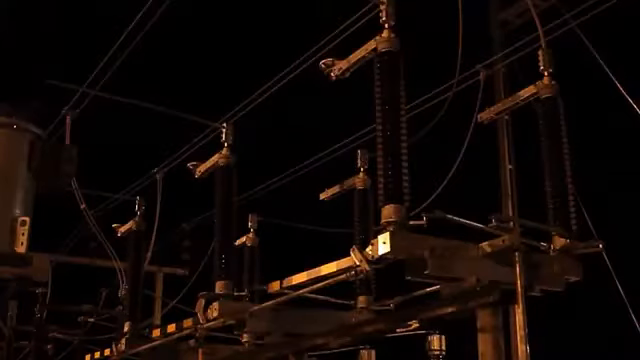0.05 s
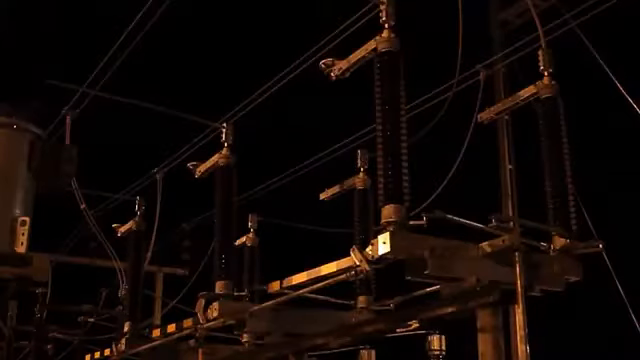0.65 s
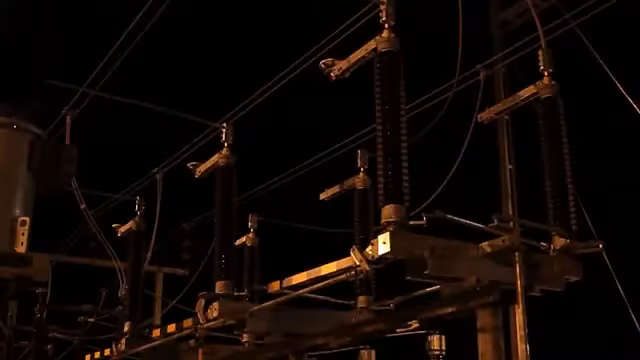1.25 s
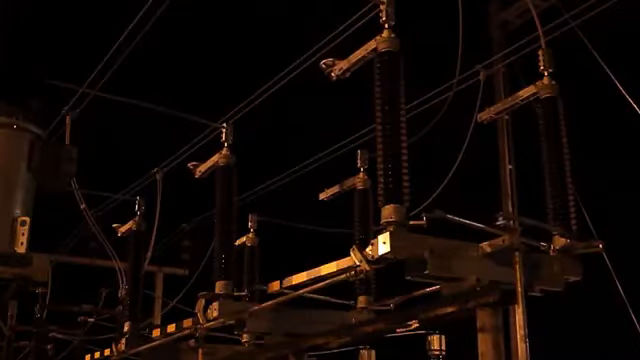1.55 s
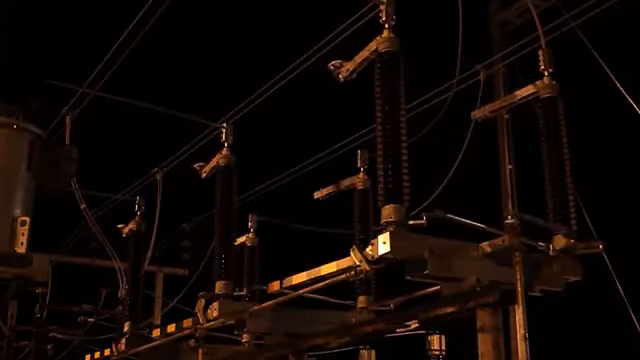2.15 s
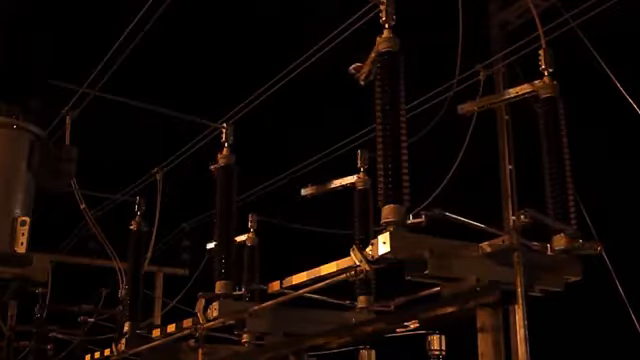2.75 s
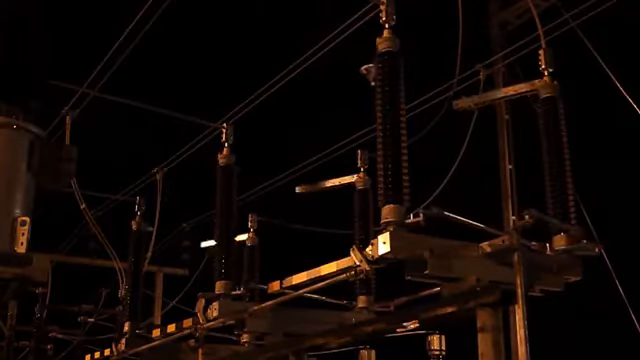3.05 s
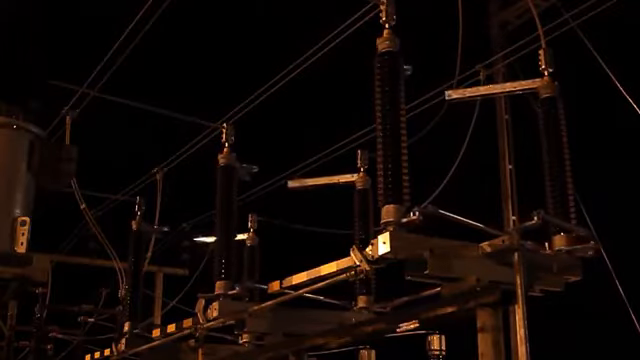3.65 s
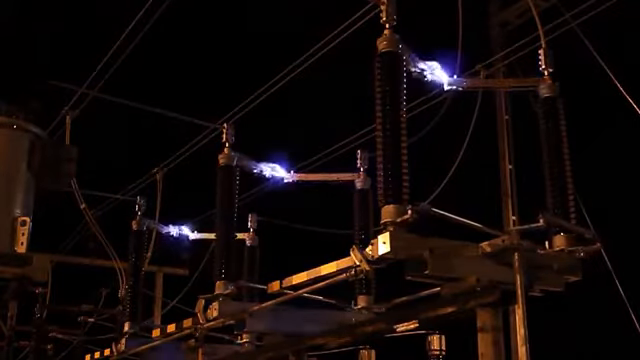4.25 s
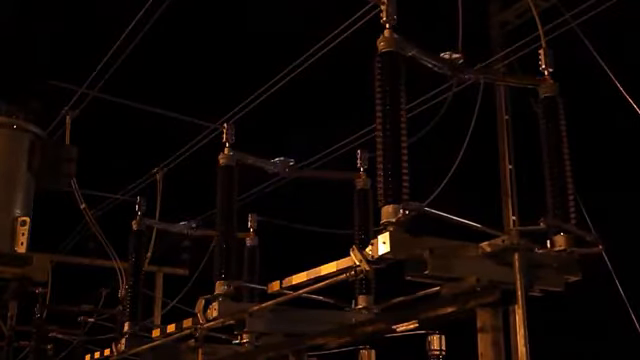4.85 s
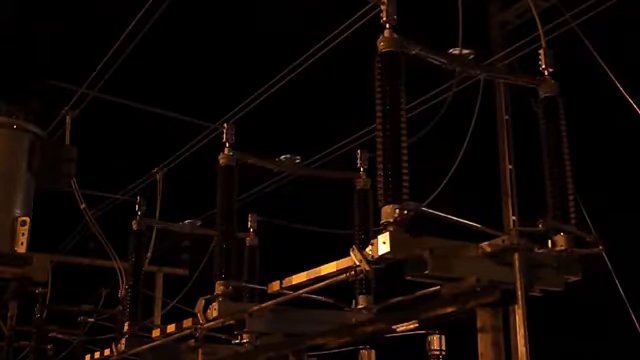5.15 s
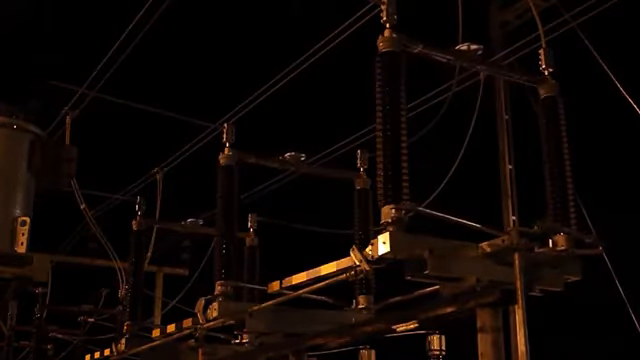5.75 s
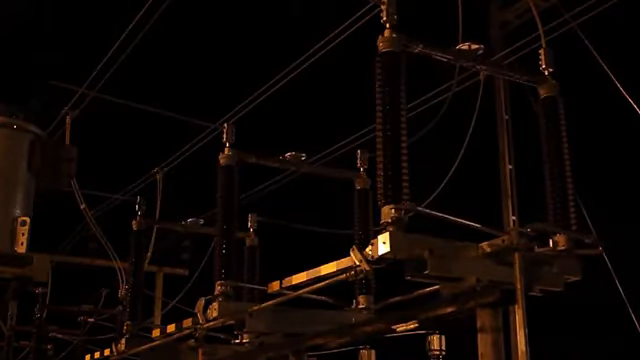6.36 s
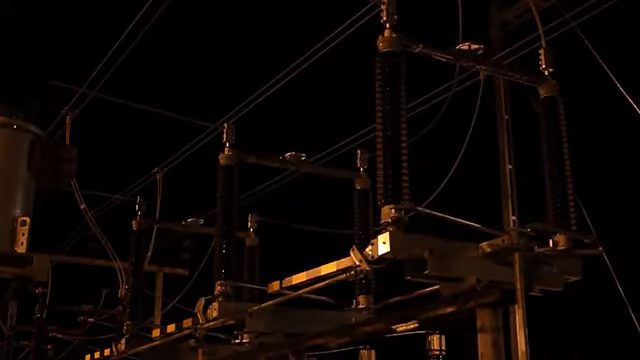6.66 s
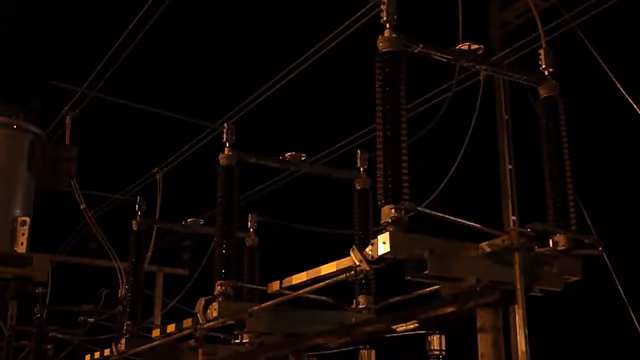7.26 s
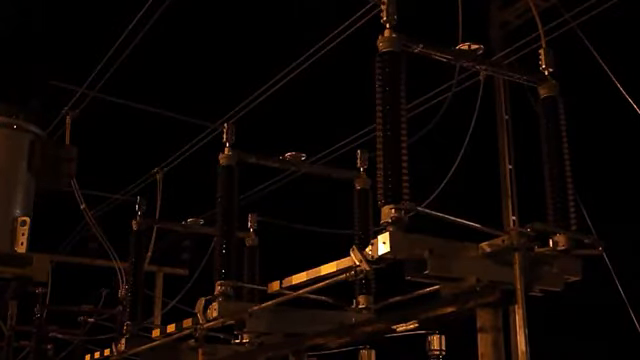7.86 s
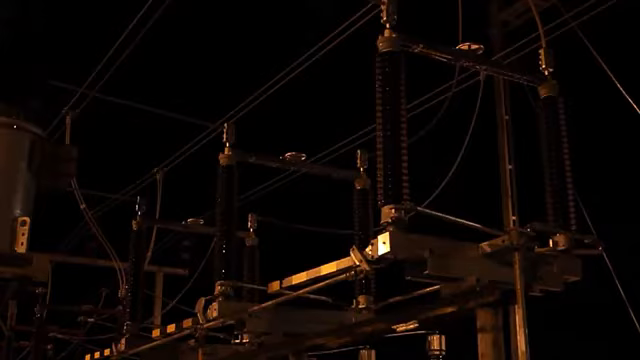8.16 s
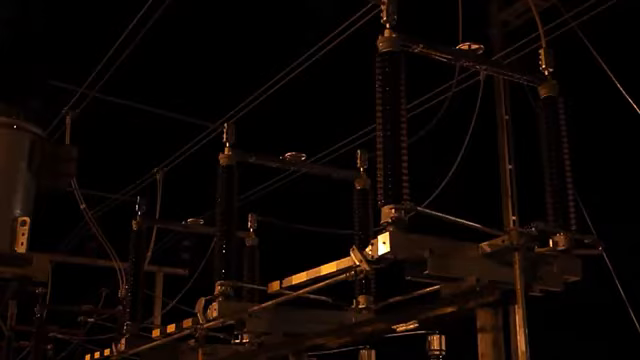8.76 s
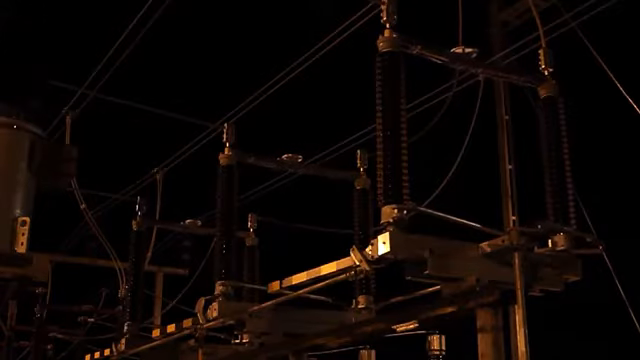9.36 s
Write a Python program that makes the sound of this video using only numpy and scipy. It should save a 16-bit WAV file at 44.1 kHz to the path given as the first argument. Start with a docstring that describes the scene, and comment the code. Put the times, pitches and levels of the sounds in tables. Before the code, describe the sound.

A faint transformer hum with a few tiny spark ticks and a soft thump opens the scene in an outdoor switchyard. At about 0.75 seconds a motor drive starts with a clack and jolt, then runs with a high, slightly wavering gear whine over metallic grinding. At 4.2 seconds a very loud electric crack with short thumps sets off a harsh, buzzing sizzle, which thins to a fizz and ends by 4.9 seconds. The arc pushes the motor down in level, and the whine swells back afterwards. Around 6.2 seconds the whine rises slightly, then winds down at 6.4 with a knock, a faint metal ring and a few faint scrapes. Only low hum and dull distant noise remain until 8.1 seconds, when the drive clacks into motion again and whines on to the end at about 9.5 seconds.

```python
"""A high-voltage switchyard at night. A motor drive swings a disconnector shut: its gears whine at the
tooth-mesh frequency, and tooth impacts excite the modes of housing and cabinet under changing load.
As the blades near their contacts the air breaks down; arcs crack and sizzle until metal meets metal,
and a gain control ducks the whole sound. The drive runs down, leaving transformer hum and distant
noise, and then starts up again."""
import sys
import numpy as np
from scipy import signal
from scipy.fft import rfft, irfft, next_fast_len
from scipy.io import wavfile
from scipy.ndimage import uniform_filter1d, map_coordinates

SR = 44100
rng = np.random.default_rng(int(sys.argv[2]) if len(sys.argv) > 2 else 0)


def put_to_file(sound):
    """Save the sound as 16-bit audio at rate SR, in the file named by the first command-line argument."""
    columns = np.atleast_2d(sound).T  # one column per channel
    safe = np.clip(columns, -1, 1)
    whole_steps = np.round(safe * 32767)
    wavfile.write(sys.argv[1], SR, whole_steps.astype(np.int16))


N = 419391
TIME = np.arange(N) / SR

# transformer hum, from twice the mains frequency upward: (frequency [Hz], level re background [dB])
HUM_PARTIALS = [(100, -13), (200, -7.5), (400, -14.5), (1000, -19.5)]


def motor_drive():
    """Gear noise follows speed and load: the motor runs, coasts to rest and starts again."""
    # each run at working speed: (time [s], mesh frequency [Hz], whine level [dB])
    first_run = [(0.82, 1091, -14.5), (0.87, 1091, -17), (0.9, 1144, -32.5), (0.99, 1152, -25.5),
                 (1.04, 1112, -14.5), (1.08, 1101, -19), (1.21, 1103, -22), (1.25, 1111, -19.5),
                 (1.35, 1116, -19.5), (1.39, 1138, -28.5), (1.46, 1151, -28), (1.49, 1135, -16.5),
                 (1.51, 1131, -25.5), (1.69, 1159, -26), (1.76, 1161, -21), (1.89, 1108, -18),
                 (2.05, 1124, -25), (2.14, 1113, -16), (2.18, 1100, -22.5), (2.35, 1113, -19),
                 (2.42, 1101, -23), (2.66, 1118, -18), (2.7, 1112, -21.5), (2.82, 1113, -18),
                 (3.0, 1114, -23), (3.1, 1128, -28), (3.18, 1120, -18), (3.26, 1126, -28),
                 (3.32, 1123, -18), (3.36, 1122, -20), (3.4, 1141, -27.5), (3.62, 1121, -18),
                 (3.66, 1121, -20), (3.71, 1130, -31), (3.84, 1114, -17), (4.0, 1112, -21.5),
                 (4.04, 1135, -27.5), (4.15, 1136, -25.5), (4.9, 1128, -25), (5.0, 1111, -17.5),
                 (5.1, 1147, -28.5), (5.19, 1146, -24), (5.26, 1104, -17.5), (5.33, 1123, -16.5),
                 (5.452, 1124, -25), (5.524, 1123, -21), (6.164, 1173, -24.5), (6.274, 1187, -36),
                 (6.33, 1177, -31), (6.36, 1180, -28), (6.385, 1180, -14.5), (6.415, 1177, -27)]
    second_run = [(8.18, 1105, -16), (8.238, 1103, -17.5), (8.278, 1159, -31.5), (8.338, 1162, -18),
                  (8.366, 1137, -22), (8.458, 1133, -20), (8.774, 1136, -25.5), (8.884, 1149, -20),
                  (9.024, 1149, -24), (9.084, 1135, -22), (9.44, 1106, -19), (9.5, 1107, -20)]
    # mesh harmonics, each near a resonance: (multiple, first-run level [dB], second-run level [dB],
    # resonance [Hz], bandwidth [Hz], lift [dB])
    harmonics = [(2, -34, -32.5, 2244, 60, 8), (3, -48, -38, 3412, 50, 9.5), (4, -46, -45, 4400, 40, 9),
                 (7, -50, -61, 8130, 200, 9.5)]
    # tones of the slower shaft: (multiple of its rate, first-run level [dB], second-run level [dB])
    shaft_tones = [(1, -0.5, 8), (1.5, -4.5, 2.5), (2, -2.5, -5), (2.75, -5.5, -25), (4.1, 0.5, -13),
                   (4.4, 0.5, -12), (5.4, 0.5, -9), (7.4, -9, -0.5), (8.4, -4.5, 1.5), (9.8, -15, -12),
                   (10.8, -7.5, -0.5), (11.8, -8, -18)]
    first = gear_train(first_run, on_s=0.745, off_s=6.34, free_hz=1192.5,
                       harmonics=[(k, db, *mode) for k, db, _, *mode in harmonics],
                       shaft_tones=[(k, db) for k, db, _ in shaft_tones], tones_db=-8.5,
                       grind_db=-25.3, ring_db=-29.5, body_db=-25.8, shudder_db=-12.5, jolt_db=-3)
    second = gear_train(second_run, on_s=8.112, off_s=np.inf, free_hz=1206,
                        harmonics=[(k, db, *mode) for k, _, db, *mode in harmonics],
                        shaft_tones=[(k, db) for k, _, db in shaft_tones], tones_db=-10.5,
                        grind_db=-25.0, ring_db=-30.0, body_db=-28, shudder_db=-16.5, jolt_db=-20.5)
    return first + second


def gear_train(run, on_s, off_s, free_hz, harmonics, shaft_tones, tones_db,
               grind_db, ring_db, body_db, shudder_db, jolt_db):
    """Forced vibration: teeth whine, their impacts shake housing and cabinet, a shaft adds tones."""
    # modes of the steel cabinet and gear housing: (frequency [Hz], bandwidth [Hz], relative level [dB])
    cabinet_modes = [(190.2, 22.3, -20), (278, 35, -24), (380.7, 19.3, -7), (411, 11, -11), (460, 20.6, -6),
                     (738, 11, -16.5), (791, 14, -14), (952, 26, -7.5), (1109, 21, -2.5), (1299, 62, -9),
                     (1358, 27, -4), (1498, 57, -6.5), (1575, 26, -4.5), (1686, 32, 3.5), (1738, 27, 3),
                     (1795, 25, 4.5), (1937, 37, -4.5), (2117, 35, 2)]
    housing_modes = [(2293, 57, 1), (2497, 50, 1), (2689, 47, 5.5), (2957, 17, 5), (3124, 29, 0),
                     (3412, 44, 1.5), (3720, 46, -3), (4265, 39, 3), (4427, 70, -6), (4770, 56, -5.5),
                     (5450, 83, -2), (8070, 90, -5.5), (8800, 39, -8.5)]
    # spectra of tooth grinding and backlash rattle: (frequency [Hz], relative level [dB])
    grinding_spectrum = [(60, -41), (200, -26), (400, -7), (650, -11.5), (950, -5), (1400, 2), (2300, -3),
                         (3200, -2), (4400, -2.5), (5700, -4), (6800, -12), (10500, -11.5), (13000, -16),
                         (15000, -23)]
    rattle_spectrum = [(30, -40), (120, -24), (330, -5.5), (480, 4.5), (850, -6), (1400, -1), (2500, -14.5),
                       (8000, -44)]
    teeth_per_turn, idle_share, jolt_s = 6.4, 0.25, 0.05
    working_hz, whine_db = curves(run)
    mesh_hz, load, up, down = motor_motion(working_hz, on_s, off_s, free_hz)
    # below working speed the teeth rattle in their backlash and the tone breaks up
    slack = np.clip(1 - mesh_hz / 1080, 0, 1)
    flutter = .002 * wobble(70) + .19 * slack * wobble(350)
    loose = np.minimum(3 * slack, .75)
    mesh_phase = 2 * np.pi * np.cumsum(mesh_hz * (1 + flutter)) / SR
    shaft_phase = mesh_phase / teeth_per_turn
    # at a crawl the teeth only rub and no longer sing
    striking = np.clip(mesh_hz / 470, 0, 1) ** 3
    tone = mesh_tone(mesh_phase, mesh_hz, load, whine_db, harmonics)
    whine = striking * np.sqrt(1 - loose) * up ** 1.7 * down ** 0.58 * tone
    # shaft tones grow as the unloaded motor races, and swell on each cabinet mode they cross
    racing = np.clip((mesh_hz - 1135) / 30, -1, 1)
    shaft_force = sum(amp(db + 3.2 * wobble(10)) * np.sin(k * shaft_phase + 0.22 * wobble(23))
                      for k, db in shaft_tones)
    drone = amp(tones_db + 3.2 * racing) * (1 - slack) ** 2 * resonate(shaft_force, cabinet_modes)
    # impacts bunch once a turn and once a tooth, and hit harder under load
    bunching = amp(0.5 * np.sin(shaft_phase) + 2 * np.sin(mesh_phase)
                   + 0.66 * wobble(130) + 0.9 * wobble(14))
    impacts = lambda: bunching * (grains(rate=6000, spread_db=1.0) + rng.standard_normal(N))
    force = (idle_share + (1 - idle_share) * load) * up ** 0.74 * down ** 2.66
    grinding = amp(grind_db) * colour(impacts(), grinding_spectrum)
    housing = amp(ring_db) * resonate(impacts(), housing_modes)
    # the jolt of the starting torque shudders through the cabinet and dies away
    jolt = up * np.exp(-since(on_s) / jolt_s)
    shake = amp(body_db + 3.4 * racing) * load ** .2 * up * down ** 1.8 + amp(shudder_db) * jolt
    cabinet = shake * (resonate(impacts(), cabinet_modes) + drone)
    rattle_gain = (amp(jolt_db) * jolt + amp(-24) * up * down ** 1.2) * np.sqrt(loose)
    rattle = rattle_gain * colour(impacts(), rattle_spectrum)
    return whine + force * (grinding + housing) + cabinet + rattle


def motor_motion(working_hz, on_s, off_s, free_hz):
    """Torque-speed relation: load slows the motor, and inertia adds force while it is being slowed."""
    spin_up_s, coast_s, inertia_s = 0.04, 0.175, 0.038
    wander_hz, sag_hz_per_load = 2.796, 77.3
    smooth_hz = uniform_filter1d(working_hz, size=1100)
    # shares of working speed while spinning up and coasting down
    up = 1 - np.exp(-(since(on_s) / spin_up_s) ** 2)
    down = np.exp(-(since(off_s) / coast_s) ** 1.7)
    mesh_hz = (smooth_hz + wander_hz * wobble(25)) * up * down
    load = (free_hz - mesh_hz - inertia_s * np.gradient(smooth_hz) * SR) / sag_hz_per_load
    return mesh_hz, uniform_filter1d(np.clip(load, .12, 1.2), size=900), up, down


def mesh_tone(phase, mesh_hz, load, whine_db, harmonics):
    """Periodic tooth contact makes a tone whose harmonics grow with load and swell at resonance."""
    tone = amp(whine_db + 0.67 * wobble(90)) * np.sin(phase + 0.14 * wobble(120))
    for k, db, hz, width, lift_db in harmonics:
        swell_db = lift_db / (1 + (2 * (k * mesh_hz - hz) / width) ** 2)
        gain = load ** 0.9 * amp(db + swell_db + 1.8 * wobble(55) + 2.0 * wobble(12))
        tone += gain * np.sin(k * (phase + 0.13 * wobble(120)))
    return np.sqrt(2) * tone


def arcs():
    """Dielectric breakdown: the gaps restrike again and again, most strongly at the voltage crests."""
    # spectra of the arc's three parts: (frequency [Hz], relative level [dB])
    sizzle = [(300, -25.5), (1500, -14.5), (3000, -15), (4600, -4.5), (6200, -4), (8000, -8), (10000, -6.5),
              (15000, -19.5)]
    fizz = [(3000, -31.5), (8000, -13), (10000, -5), (12500, 5), (15000, -1)]
    roar = [(30, -23), (90, -13.5), (400, -1.5), (1200, -4), (2500, 0), (4500, 2.5), (8000, -3),
            (15000, -20.5)]
    # as the gaps shorten the roar dies first and the thin fizz last; rows are sizzle, fizz, roar:
    # (level [dB], sag [dB/s], release time [s], release rate [dB/s])
    envelopes = [(-3, 17, 4.81, 257.5), (-9, 4, 4.85, 399), (-3.5, 17, 4.58, 169.5)]
    strike_s, rise_s, crest_hz = 4.174, 0.016, HUM_PARTIALS[0][0]
    crests = amp(.8 * np.sin(2 * np.pi * crest_hz * TIME) + .3 * wobble(140))
    out = np.zeros(N)
    for (db, sag, release_s, release), spectrum in zip(envelopes, (sizzle, fizz, roar)):
        level_db = db - sag * since(strike_s) - release * since(release_s)
        flicker_db = 0.27 * wobble(30)  # the arc channel wanders
        # sharp snaps ride on a dense steady hiss
        restrikes = crests * grains(rate=12000, spread_db=1.5) + 3.1 * rng.standard_normal(N)
        out += amp(level_db + flicker_db) * colour(restrikes, spectrum)
    return (1 - np.exp(-since(strike_s) / rise_s)) * out


def sparks():
    """Impulsive discharge: each spark radiates a steep pressure spike and a very short crackle."""
    # single discharges: (time [s], level [dB])
    discharges = [(0.144, -27), (0.204, -28), (0.304, -27), (0.344, -25), (0.384, -25.5), (0.595, -31.5),
                  (0.637, -29.5), (0.684, -24.5), (4.1747, 11), (4.1795, 11), (4.186, 7)]
    out, t = np.zeros(N), np.arange(SR // 50) / SR
    for s, db in discharges:
        spike = np.cos(2 * np.pi * 5500 * t) * decay(t, t60=0.0009)
        crackle = .25 * rng.standard_normal(len(t)) * decay(t, t60=0.0064)
        add(out, s, amp(db) * (spike + crackle))
    return echoes(out, t60=0.059, wet_db=-7)


def thumps():
    """Heavily damped oscillation: each blow builds up over its first cycle and dies quickly."""
    # thumps and knocks: (time [s], level [dB], frequency [Hz], t60 [s])
    blows = [(0.244, -12, 90.5, 0.052), (0.624, -27, 62, 0.2), (4.227, 8.5, 189, .018),
             (4.2563, 12, 170, 0.018), (4.308, -6, 130, 0.03), (4.345, -10, 100, 0.045),
             (6.426, -10.5, 970, 0.029)]
    out, t = np.zeros(N), np.arange(SR // 3) / SR
    for s, db, hz, t60 in blows:
        envelope = amp(db) * decay(t, t60) * (1 - np.exp(-hz * t))
        add(out, s, envelope * np.sin(2 * np.pi * hz * t))
    return out


def clacks():
    """Impact and friction: contacts and linkage take up their play in gritty bursts."""
    # clacks and short scrapes: (time [s], level [dB], t60 [s])
    bursts = [(0.021, -31, .05), (0.686, -37, 0.066), (0.747, -18, 0.063), (0.769, -9.5, 0.025),
              (1.478, -23, 0.054), (6.699, -39, 0.24), (6.765, -43.5, 0.15), (6.838, -44, 0.15),
              (8.111, -30.5, 0.067), (8.141, -17.5, 0.043), (8.155, -25, 0.016), (8.173, -15.5, 0.027)]
    # their spectrum: (frequency [Hz], relative level [dB])
    spectrum = [(30, -30), (150, -1.5), (1500, 5.5), (4500, 1.5), (9000, 1.0), (15000, -7)]
    envelope, t = np.zeros(N), np.arange(SR // 3) / SR
    for s, db, t60 in bursts:
        add(envelope, s, amp(db) * decay(t, t60) * (1 - np.exp(-20 * t / t60)))
    return envelope * colour(grains(rate=4300, spread_db=-2.0), spectrum)


def metal_ring():
    """Free vibration: a metal part rings on as the drive comes to rest."""
    # the ringing mode: (time [s], level [dB], frequency [Hz], rise time [s], t60 [s])
    mode = (6.5, -37.5, 2848, 0.06, 0.5)
    s, db, hz, rise_s, t60 = mode
    envelope = (1 - np.exp(-since(s) / rise_s)) * decay(since(s), t60) * amp(db + 1.2 * wobble(40))
    return envelope * np.sin(2 * np.pi * hz * TIME + .3 * wobble(60))


def transformer_yard():
    """Harmonics of twice the mains frequency: transformers hum over a dull distant wash."""
    # the background: (time [s], level [dB])
    levels = [(0, -41), (0.75, -42), (1.0, -60), (6.6, -53), (7.1, -53.5), (7.6, -54), (8.1, -49.5),
              (9.51, -59)]
    # spectrum of distant noise: (frequency [Hz], relative level [dB])
    distant_spectrum = [(15, -35.5), (25, -13.5), (90, -10.5), (167, -14.5), (202, -5.5), (301, -9.5),
                        (394, -7.5), (588, -9.5), (1000, -10), (1860, -21.5), (2240, -25), (2500, -27.5),
                        (15000, -34)]
    level_db, = curves(levels)
    hum = sum(amp(db + 1.46 * wobble(7.6)) * np.sin(2 * np.pi * hz * TIME + 0.28 * wobble(9))
              for hz, db in HUM_PARTIALS)
    wash = amp(-1.0 + 1.6 * wobble(15)) * colour(rng.standard_normal(N), distant_spectrum)
    return amp(level_db) * (np.sqrt(2) * hum + wash)


def echoes(x, t60, wet_db):
    """Scattering from the steelwork adds a decaying tail of reflections."""
    t = np.arange(SR // 2) / SR
    tail = rng.standard_normal(len(t)) * decay(t, t60)
    return x + amp(wet_db) * signal.fftconvolve(x, tail / np.linalg.norm(tail))[:N]


def gain_control(x):
    """Compression: loud treble pulls the whole gain down at once; it creeps back afterwards."""
    treble_hz, threshold_db, cut_share = 7050, -25.5, 0.74
    average_s, lag_s, recover_s = 0.012, 0.002, 0.49
    treble = signal.sosfilt(signal.butter(2, treble_hz, "high", fs=SR, output="sos"), x[0])
    pole = np.exp(-1 / (average_s * SR))
    treble_db = 10 * np.log10(signal.lfilter([1 - pole], [1, -pole], treble ** 2) + 1e-12)
    needed_db = cut_share * np.maximum(treble_db - threshold_db, 0)
    recovery = np.exp(-TIME / recover_s)
    cut_db = np.maximum.accumulate(needed_db / recovery) * recovery
    return x * amp(-np.interp(TIME - lag_s, TIME, cut_db))


def amp(db):
    """Decibels to amplitude ratio."""
    return 10 ** (np.asarray(db) / 20)


def decay(t, t60):
    """Exponential decay by 60 dB in t60 seconds."""
    return amp(-60 * t / t60)


def since(s):
    """Seconds elapsed since s, zero before it."""
    return np.maximum(TIME - s, 0)


def unit(x):
    """Normalisation to rms 1."""
    return x / np.sqrt(np.mean(x ** 2) + 1e-20)


def add(track, s, sound):
    """Superposition of a sound on the track at s seconds."""
    part = track[max(round(s * SR), 0):][:len(sound)]
    part += sound[:len(part)]


def curves(rows):
    """Linear interpolation of each column after the time, one value a sample."""
    times, *columns = np.transpose(rows)
    return [np.interp(TIME, times, column) for column in columns]


def wobble(rate):
    """Smooth random modulation, rate knots a second."""
    knots = rng.standard_normal(int(N * rate / SR) + 4)
    return np.interp(TIME, TIME[::20], map_coordinates(knots, [TIME[::20] * rate]))


def grains(rate, spread_db):
    """Shot noise: random impulses of uneven size, rate a second; rms 1."""
    hits = rng.random(N) < rate / SR
    return unit(hits * rng.standard_normal(N) * amp(spread_db * rng.standard_normal(N)))


def filtered(x, response):
    """Linear filtering: the spectrum of x times a frequency response."""
    size = next_fast_len(N + SR // 2)
    return irfft(rfft(x, size) * response(np.fft.rfftfreq(size, 1 / SR)), size)[..., :N]


def colour(x, points):
    """Spectral shaping by (frequency [Hz], level [dB]) points; rms 1."""
    hz, db = np.transpose(points)
    return unit(filtered(x, lambda f: amp(np.interp(np.log(f + 1), np.log(hz), db))))


def resonate(x, modes):
    """Modal superposition: x drives damped resonators of alternating sign; rms 1."""
    def response(f):
        return sum((-1) ** k * amp(db) * 1j * f * width / (hz * hz - f * f + 1j * f * width)
                   for k, (hz, width, db) in enumerate(modes))
    return unit(filtered(x, response))


def scene():
    """Superposition: all sources reach both channels alike."""
    mono = motor_drive() + sparks() + thumps() + clacks() + metal_ring() + transformer_yard() + arcs()
    return np.array([mono, mono])


def record(dry):
    """Compression, clipping and a band limit: the arcs duck the drive and the loudest crack clips."""
    clipped = np.clip(gain_control(dry), -1, 1)
    return filtered(clipped, lambda hz: hz < 15300)


dry = scene()
out = record(dry)
put_to_file(out)
```